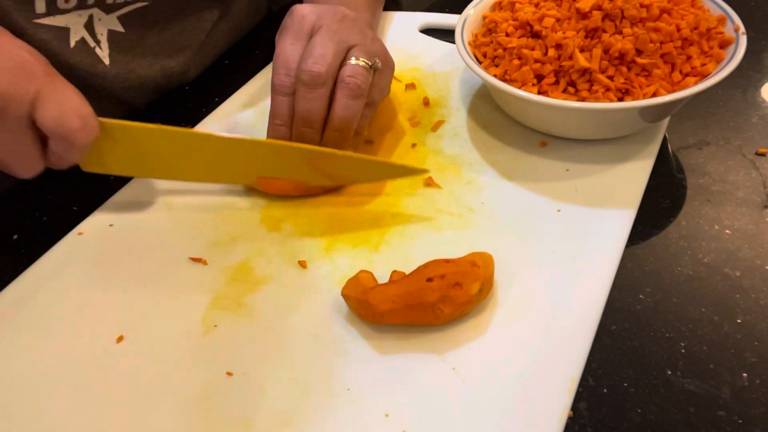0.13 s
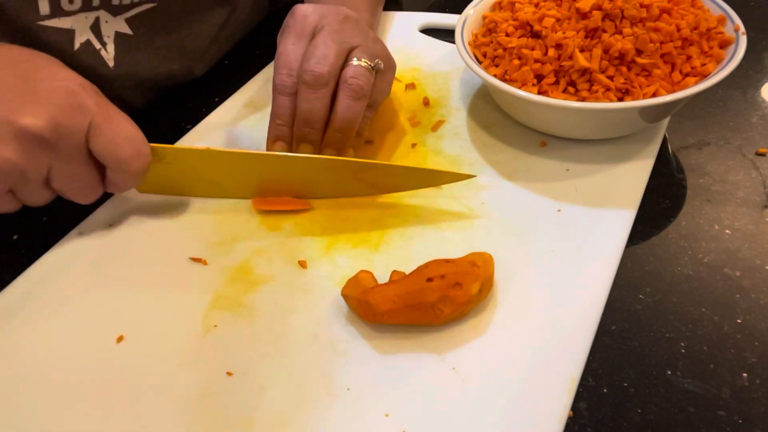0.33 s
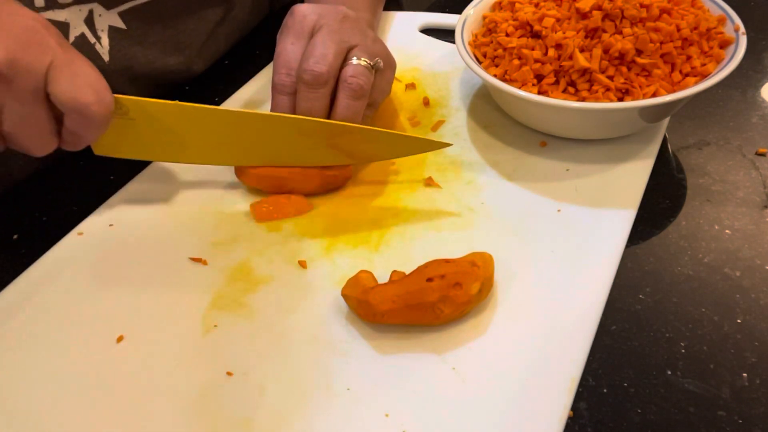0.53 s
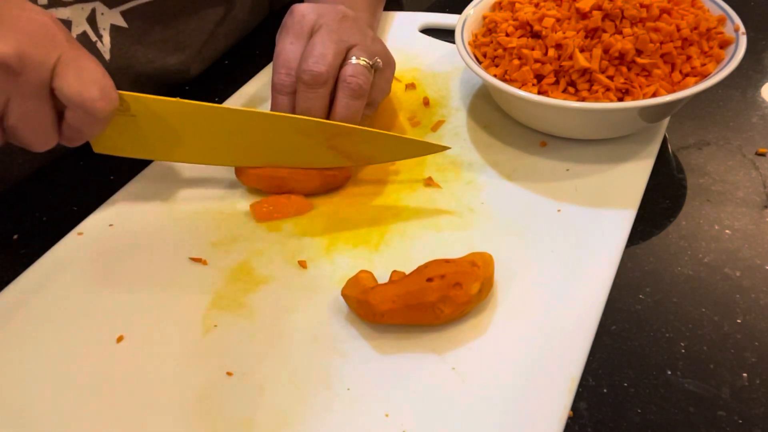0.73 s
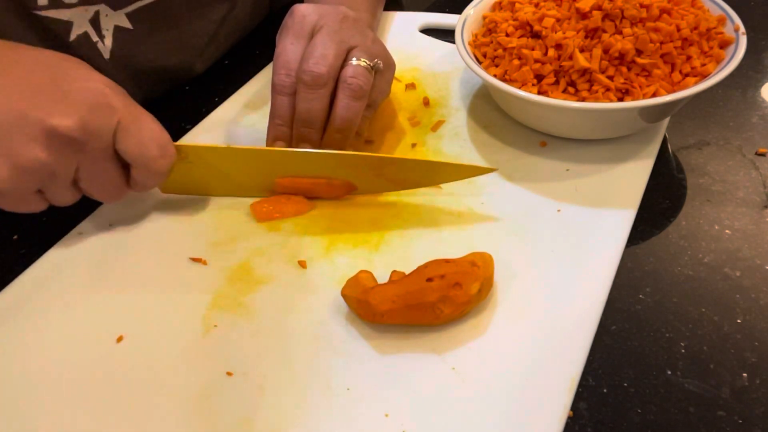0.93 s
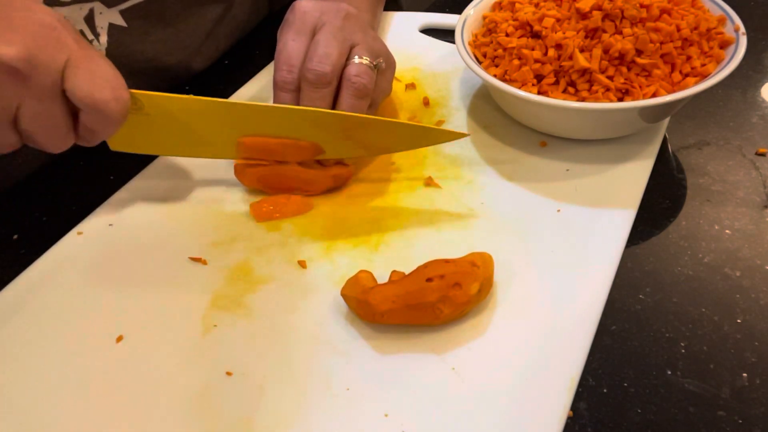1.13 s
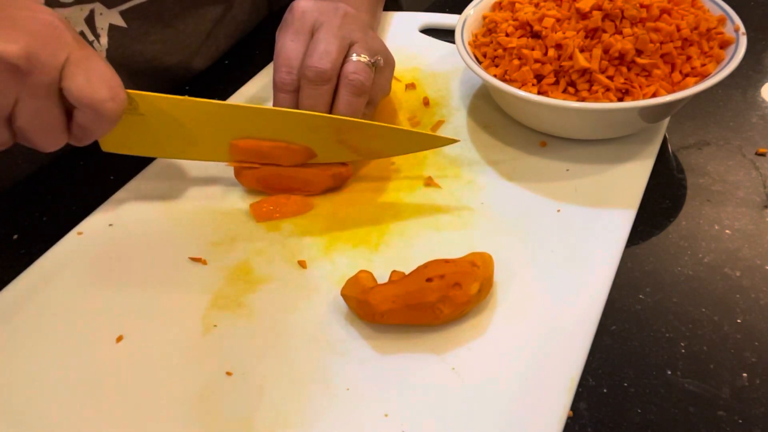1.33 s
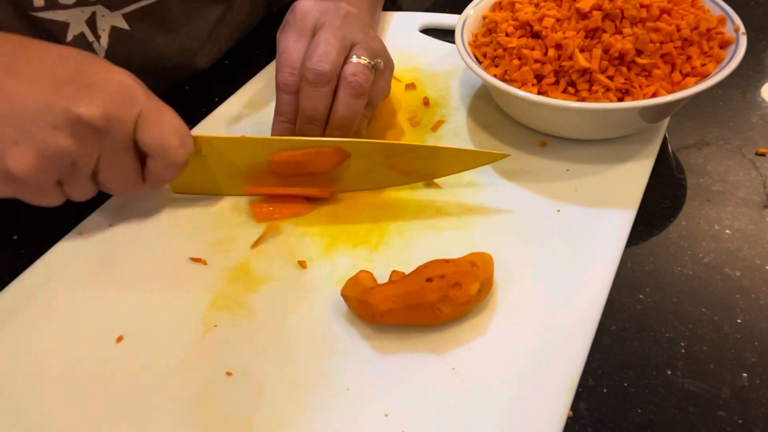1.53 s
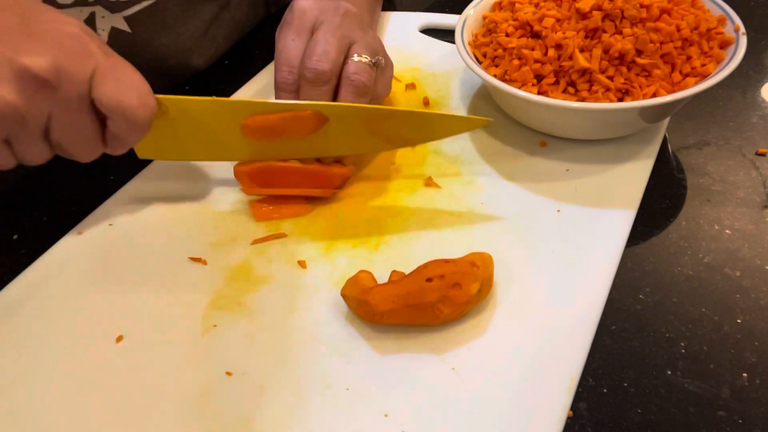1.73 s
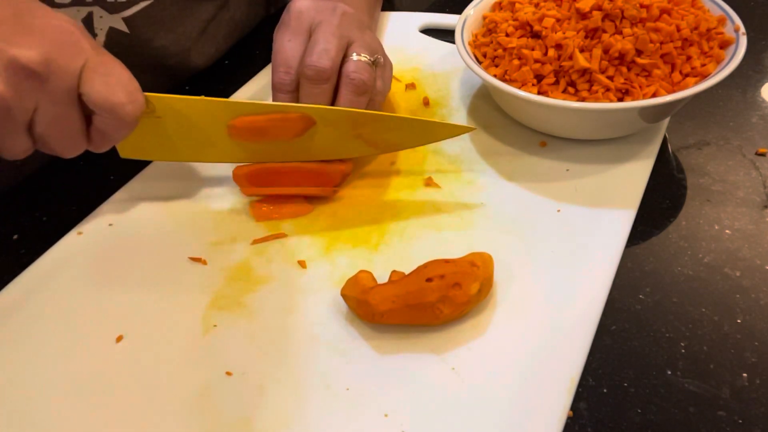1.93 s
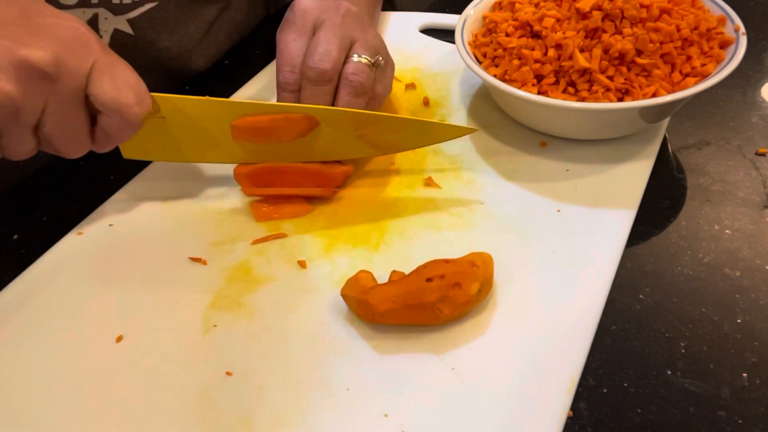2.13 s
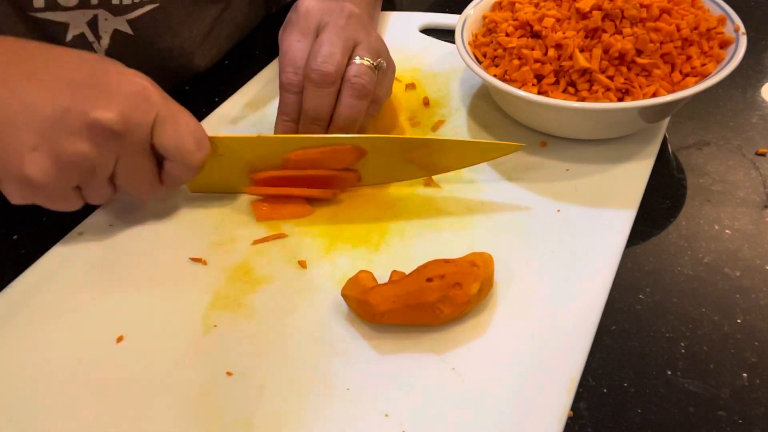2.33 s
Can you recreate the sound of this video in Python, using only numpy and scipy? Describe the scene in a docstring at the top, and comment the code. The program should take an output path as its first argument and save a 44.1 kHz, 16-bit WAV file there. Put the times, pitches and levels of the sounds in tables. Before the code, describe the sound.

Four crunchy knife chops through a firm raw root, each ending in a hard cutting-board knock.

```python
"""Slicing a crisp root

A kitchen knife cuts four slices off a crisp root on a plastic board, close to the microphone.
Random fibre breaks crackle louder as the blade sinks; each slice cracks, snaps and the blade knocks.
The knock is a dispersive bending wave (treble first) ringing the board; damped modes thump the counter.
Nicks, soft bumps and a low rumble are shaped noise; reflections and a decaying tail form the kitchen."""
import sys
import numpy as np
from scipy import signal
from scipy.fft import rfft, irfft
from scipy.io import wavfile

SR = 44100
rng = np.random.default_rng(int(sys.argv[2]) if len(sys.argv) > 2 else 0)


def inscribe(sig):
    """Save sig as 16-bit PCM at rate SR to the path in sys.argv[1].

    A 1-D sig is mono; a 2-D sig holds one channel per row.
    Samples are clipped to [-1, 1] before scaling.
    """
    pcm = np.round(np.clip(np.atleast_2d(sig).T, -1, 1) * 32767)
    wavfile.write(sys.argv[1], SR, pcm.astype(np.int16))


N = 105046
SIZE = 2 ** 18  # transform length, samples
HZ = np.maximum(np.fft.rfftfreq(SIZE, 1 / SR), 1)
TILT_FROM_HZ = 1700  # spectral tilts act above this
T60_NEPERS = np.log(1000)  # a 60 dB decay

# the four cuts, each ending in a knock; levels are relative to those of their sources:
# knock_s, knock_db, treble_tilt_db_per_octave, thump_db, cut_db, cut_length_s, snap_db
CUTS = [(0.1624, 0.5, -1.1, 5, -1.5, 0.095, 7), (.8183, 1.5, -6.55, 5.5, 0, 0.11, 3.5),
        (1.4646, 1.5, -0.96, 2, -1.5, 0.13, 1), (2.2682, 1.5, -4, 4.5, -1.5, .15, -1.5)]
# spectrum of tearing fibres: frequency_hz, level_db
FIBRE_COLOUR = [(100, -12.5), (500, -1), (1200, -2.5), (3200, -5.5), (5500, -4), (7600, -1), (9000, -5),
                (11300, 3), (13000, -2), (14300, -13.5), (15600, -7)]


def amp(db):
    """Level to amplitude: 20 dB is a factor of ten."""
    return 10 ** (np.asarray(db) / 20)


def unit(x):
    """Normalisation of the mean power to one."""
    return x / np.sqrt(np.mean(x ** 2) + 1e-20)


def read(points, hz=HZ):
    """Linear interpolation of a table along a logarithmic frequency axis."""
    f, value = np.transpose(points)
    return np.interp(np.log(hz + 1), np.log(f), value)


def causal(db):
    """Minimum phase: folding the cepstrum forward makes a causal response of the given gain."""
    cepstrum = irfft(np.log(amp(db)))
    cepstrum[1:SIZE // 2] *= 2
    cepstrum[SIZE // 2 + 1:] = 0
    return np.exp(rfft(cepstrum))


def through(x, response):
    """Linear filtering: spectra multiply."""
    return irfft(rfft(x, SIZE) * response)[..., :N]


def colour(x, points):
    """Spectral shaping by a filter that preserves the power of white noise."""
    response = causal(read(points))
    return through(x, response / np.sqrt(np.mean(abs(response) ** 2)))


def since(start):
    """Time axis: seconds since start, for every sample."""
    return np.arange(N) / SR - start


def ring(modes, start):
    """Modal superposition: exponentially damped sinusoids struck at start."""
    t = np.maximum(since(start), 0)
    return sum(amp(db) * np.exp(-T60_NEPERS * t / t60) * np.sin(2 * np.pi * hz * t)
               for hz, db, t60 in modes)


def rumble(level_db=-53, width=0.21):
    """Stationary coloured noise: a shared part plus a weaker independent part makes the ports coherent."""
    # spectrum of the background: frequency_hz, level_db
    rumble_colour = [(20, -11), (38, -10.5), (56, 7.5), (80, -0.5), (130, -3.5), (240, -7.5), (330, -20),
                     (600, -31.5), (1300, -34.5), (3000, -48), (6000, -53.5), (15000, -51)]
    noise = rng.standard_normal((3, N))
    ports = noise[0] + width * noise[1:]
    return amp(level_db) * unit(colour(ports, rumble_colour))


def bumps(rise_s=.004, decay_s=0.004):
    """Cushioned impact: root and fingers touch the board as dull noise bursts with a gradual onset."""
    # soft touches: start_s, level_db
    touches = [(.032, -46.5), (0.575, -38.5)]
    # spectrum of a touch: frequency_hz, level_db
    bump_colour = [(40, -4), (150, 3), (330, 6.5), (600, -6), (1300, -7.5), (2200, -20), (5000, -27.5),
                   (15000, -41.5)]
    level = 0
    for start, db in touches:
        t = np.maximum(since(start), 0)
        level = level + amp(db) * np.minimum(t / rise_s, 1) * np.exp(-t / decay_s)
    return colour(level * rng.standard_normal(N), bump_colour)


def crackle(breaks_per_s=3500, spread_db=4.5, width=0.71):
    """Random impulse train: fibres break at chance moments with uneven size, partly different at each port."""
    size = amp(spread_db * np.minimum(rng.exponential(1, (3, N)), 4))
    sign = rng.choice([-1, 1], (3, N))
    happens = rng.random((3, N)) < breaks_per_s / SR
    breaks = unit(size * sign * happens)
    return unit(breaks[0] + width * breaks[1:])  # shared train + one train per port


def nicks(rise_share=.6, pivot_hz=6000):
    """Brief fracture bursts: impulses under a short envelope as the blade is set or the slice shifts."""
    # nicks and scrapes: start_s, level_db, decay_s, tilt_db_per_octave
    scrapes = [(.05, -49.5, .012, 1), (.069, -43, .009, -1), (.102, -42.5, .009, 1.5),
               (.312, -54, .006, -3), (0.518, -65, 0.0042, 7), (.71, -51, 0.019, -0.5),
               (1.221, -59.5, 0.006, -3.5), (1.259, -68.5, .004, 9), (1.644, -57, .012, -6),
               (1.985, -62, 0.084, -0.5), (2.055, -57.5, 0.017, -1.5)]
    breaks, out = crackle(), 0
    for start, db, decay_s, tilt_db in scrapes:
        t = np.maximum(since(start), 0)
        rise = np.minimum(t / (rise_share * decay_s), 1)
        burst = breaks * amp(db) * rise * np.exp(-t / decay_s)
        octaves = np.log2(np.maximum(HZ, TILT_FROM_HZ) / pivot_hz)
        out = out + through(burst, amp(tilt_db * octaves))
    return colour(out, FIBRE_COLOUR)


def cutting():
    """Progressive fracture: the crackle swells unevenly, then the slice cracks and snaps off at the board."""
    # spectrum of the last fibres snapping: frequency_hz, level_db
    snap_colour = [(100, -12.5), (500, -9), (1200, 4), (2000, -3), (3200, 3), (5000, -6), (7600, -4.5),
                   (9500, -11.5), (16000, -13)]
    cut_level_db, rise_db, curve = -32, 43, 1.52  # rises by rise_db over the cut, fastest at first
    snap_level_db, snap_rise_s, stop_s = -17, 0.0026, 0.0015
    crack_db, crack_lead_s, crack_width_s = -30.5, .0085, 0.00061  # splits shortly before coming free
    grain_db, grain_s = 0.5, .008  # tough and soft layers make the cut uneven
    swell, snap = np.zeros((2, N))
    for start, _, _, _, cut_db, length_s, snap_db in CUTS:
        before, after = np.maximum(-since(start), 0), np.maximum(since(start), 0)
        stop = np.exp(-after / stop_s)
        swell += amp(cut_level_db + cut_db - rise_db * (before / length_s) ** curve) * stop
        snap += amp(snap_level_db + snap_db) * np.exp(-before / snap_rise_s) * stop
        snap += amp(crack_db) * np.exp(-(since(start - crack_lead_s) / crack_width_s) ** 2)
    layers = np.interp(since(0) / grain_s, np.arange(N), rng.standard_normal(N))
    tearing = colour(crackle() * swell * amp(grain_db * layers), FIBRE_COLOUR)
    return tearing + colour(crackle() * snap, snap_colour)


def knocks():
    """Dispersion and resonance: a bending wave, low notes late, rings the board; then the counter thumps."""
    # spectrum of the blow: frequency_hz, level_db
    knock_colour = [(25, -42), (90, -12), (160, -11), (240, -3.5), (310, -7), (400, -3.5), (500, -12),
                    (580, -5.5), (860, -6.5), (1030, 1), (1290, -3.5), (1480, -7.5), (1700, -3), (2080, -4),
                    (2450, -14), (2980, -8.5), (3450, -16.5), (4200, -13), (5100, -17), (6100, -24.5),
                    (7500, -27), (9300, -43), (16000, -40)]
    # resonances of the board: frequency_hz, level_db (relative to the blow), t60_s
    board_modes = [(243, -1, .13), (385, -7, .13), (562, -2, .28), (609, -1, .26), (678, 1, .28),
                   (824, -6, .22), (1027, -17, .05), (1162, -8, .06), (1293, -6, .07)]
    # resonances of the counter: frequency_hz, level_db (before the thump level is added), t60_s
    counter_modes = [(54, -37, 0.25), (109, -38.5, 0.091), (134.35, -44, 0.41), (210, -47.5, 0.12)]
    knock_level_db, counter_delay_s = 25, 0.0099
    thud_s, thud_db = 0.88, -9  # a faint low thud after the second cut
    bend_delay_s = 0.002675  # travel time at 1 kHz; it goes as one over the root of frequency
    lead_s = bend_delay_s / 2
    travel = np.exp(-4j * np.pi * bend_delay_s * np.sqrt(1000 * HZ))
    octaves = np.log2(np.maximum(HZ / TILT_FROM_HZ, 1))
    resonance = 1 + sum(amp(db) / (1 + 2j * np.pi * (HZ - hz) * t60 / T60_NEPERS)
                        for hz, db, t60 in board_modes)
    blows, thumps = 0, amp(thud_db) * ring(counter_modes, thud_s)
    for start, db, tilt_db, thump_db, *_ in CUTS:
        onset = np.exp(-2j * np.pi * HZ * (start - lead_s))  # a delay is a linear phase
        blows = blows + amp(db + tilt_db * octaves) * onset
        thumps = thumps + amp(thump_db) * ring(counter_modes, start + counter_delay_s)
    blow_response = causal(knock_level_db + read(knock_colour))
    return irfft(blows * travel * resonance * blow_response)[:N] + thumps


def kitchen(x):
    """Room acoustics: sparse reflections from counter and bowl, then a diffuse tail of decaying noise."""
    # reverberation time: frequency_hz, t60_s
    room_t60 = [(100, 4.04), (400, .45), (1000, 0.69), (2200, 0.64), (4500, 0.56), (7000, .48),
                (10000, 0.66), (15000, .24)]
    # level of the tail: frequency_hz, level_db
    tail_colour = [(60, -15), (300, -17), (520, -7), (1100, -13), (1480, -8.5), (1900, -10), (2450, -2),
                   (3000, -9.5), (3500, -2.5), (4600, -10.5), (6200, -10), (7600, -15.5), (10000, -22),
                   (15000, -21)]
    # level of the early reflections: frequency_hz, level_db
    early_colour = [(100, -10), (500, -5.5), (1200, -11), (3000, -1), (8000, -11), (15000, -12)]
    # likeness of the room at the two ports: frequency_hz, coherence (0 to 1)
    room_alike = [(100, 0.84), (250, 1), (500, 0), (1000, 0), (2000, 0)]
    early_decay_s, early_gap_s, tail_gap_s = .016, 0.0029, 0.017
    taps_per_s = 2000
    t = np.arange(SR) / SR
    hz, frame_s, z = signal.stft(rng.standard_normal((2, SR)), SR, nperseg=256)
    t60 = read(room_t60, hz)[:, None]
    decay = np.exp(-T60_NEPERS * frame_s / t60)
    z = z * decay * np.sqrt(2 * T60_NEPERS / (t60 * SR))  # evens the energy of long and short decays
    tail = signal.istft(z, SR, nperseg=256)[1][:, :SR] * (t > tail_gap_s)
    taps = rng.choice([-1, 1], (2, SR)) * (rng.random((2, SR)) < taps_per_s / SR)
    early = taps * (t > early_gap_s) * np.exp(-t / early_decay_s)
    early /= np.linalg.norm(early, axis=1, keepdims=True)
    tail_response = rfft(tail, SIZE) * causal(read(tail_colour))
    early_response = rfft(early, SIZE) * causal(read(early_colour))
    mid, side = tail_response + early_response
    alike = np.clip(read(room_alike), -1, 1)
    mid, side = mid * np.sqrt((1 + alike) / 2), side * np.sqrt((1 - alike) / 2)
    return through(x, np.array([mid + side, mid - side]))


def scene(crackle_room_db=-2):
    """Superposition: two ports hear board and root with phase and level differences, plus room and rumble."""
    # lead of the left port over the right: frequency_hz, phase_rad
    port_phase = [(100, 0.3), (450, -0.3), (620, 2.3), (1000, 0), (1550, 1.4), (1980, -3), (2580, 2.6),
                  (3000, 0), (4000, -1.95), (5000, -2), (6500, -2.5), (8000, -9.5), (9000, -11), (11500, 2),
                  (12300, 1.47), (14000, 0), (15600, 0.5)]
    # level of the left port over the right: frequency_hz, level_db
    port_balance = [(60, 3.5), (130, -2), (260, -4.5), (500, -5.5), (640, -0.5), (900, 0), (1450, 2),
                    (2100, -7.5), (2700, 2.5), (4500, -4), (7000, 2.5), (10000, -1.5), (15000, 1)]
    board, root = knocks() + bumps(), cutting() + nicks()
    half = amp(read(port_balance) / 2) * np.exp(.5j * read(port_phase))  # half the difference to each port
    direct = through(board + root, np.array([half, 1 / half]))
    # board and root each get their own random room response
    return direct + kitchen(board) + amp(crackle_room_db) * kitchen(root) + rumble()


def record(dry, low_cut_hz=40, edge_hz=15900):
    """Band limiting and saturation: deep bass is cut, peaks near full scale round off, then treble is cut."""
    high_pass = signal.butter(N=3, Wn=low_cut_hz, btype="high", fs=SR, output="sos")
    dry = signal.sosfilt(high_pass, dry)
    rounded = dry / (1 + dry ** 6) ** (1 / 6)
    low_pass = signal.firwin(511, edge_hz, window=("kaiser", 9), fs=SR)
    return signal.oaconvolve(rounded, low_pass[None], "same")


dry = scene()
out = record(dry)
inscribe(out)
```